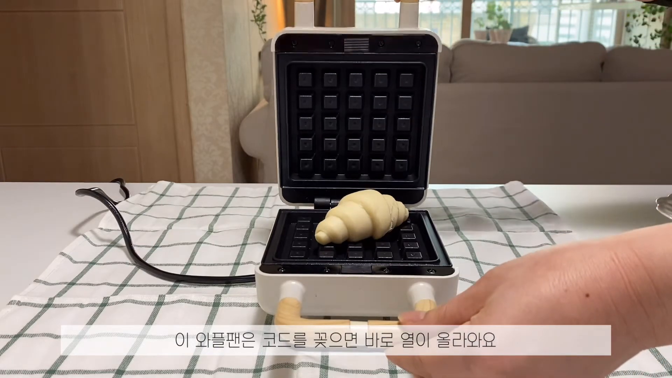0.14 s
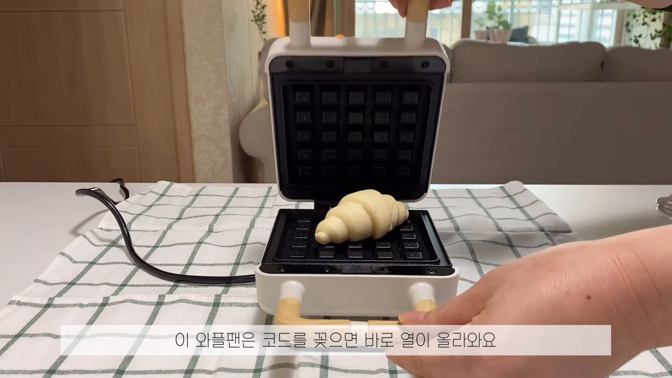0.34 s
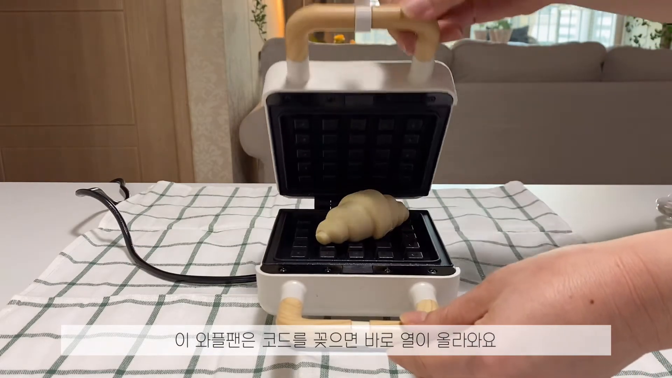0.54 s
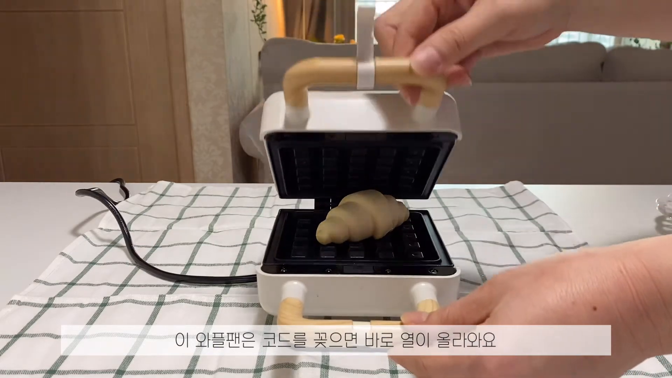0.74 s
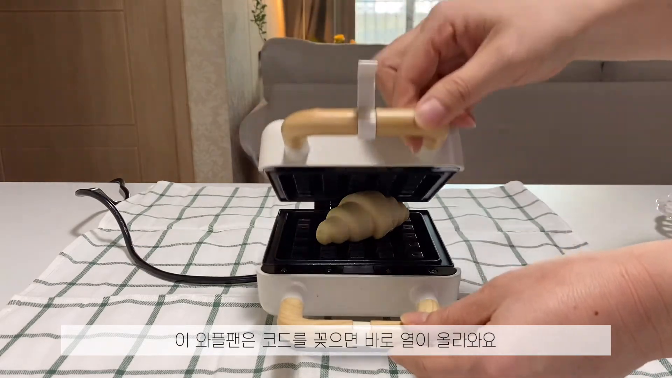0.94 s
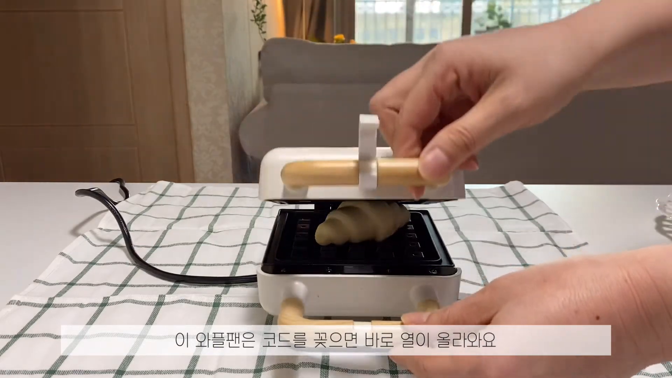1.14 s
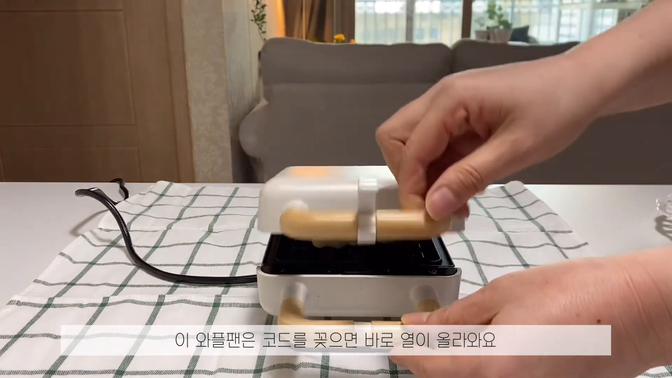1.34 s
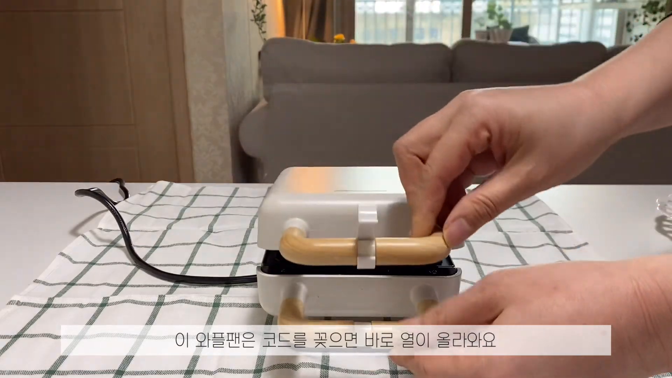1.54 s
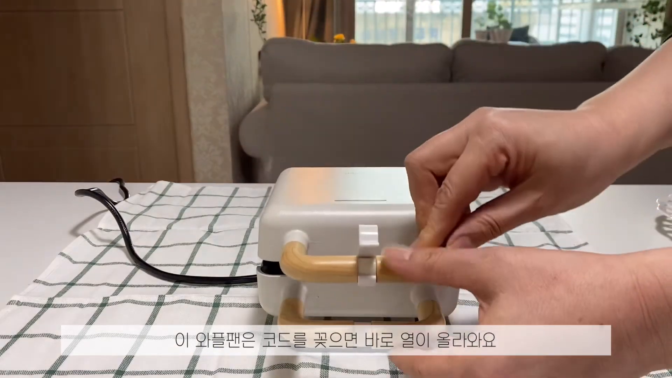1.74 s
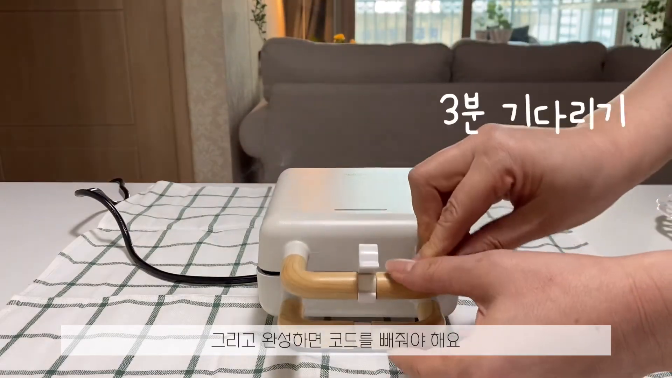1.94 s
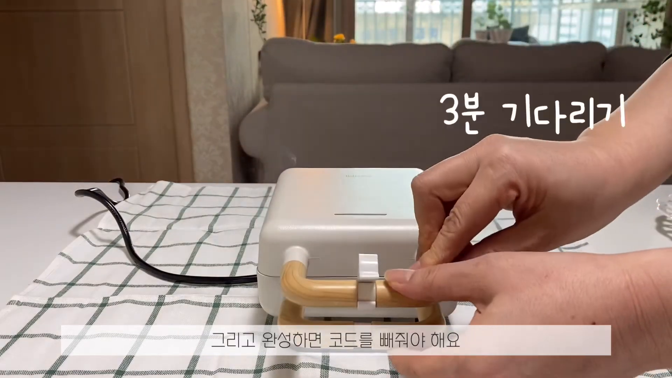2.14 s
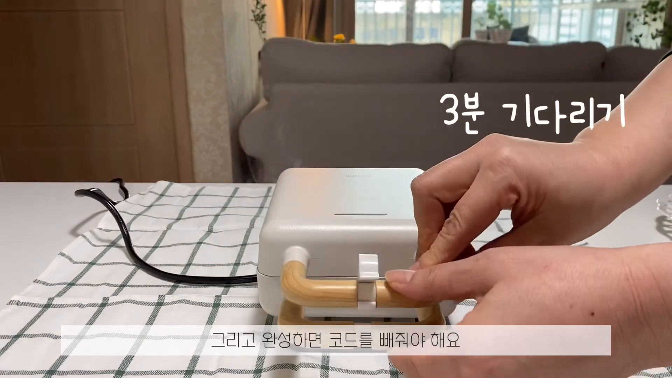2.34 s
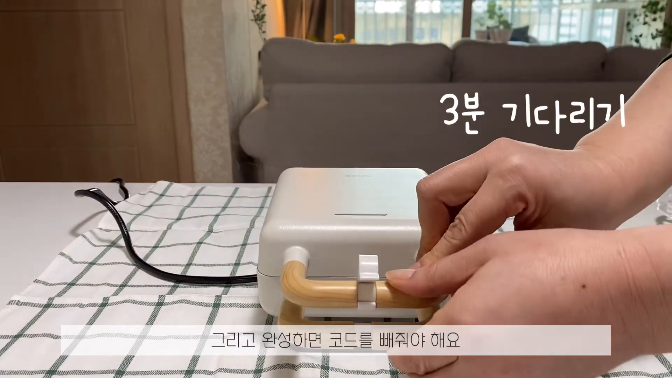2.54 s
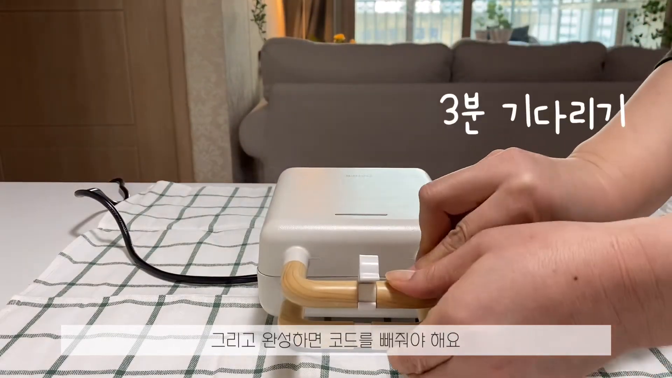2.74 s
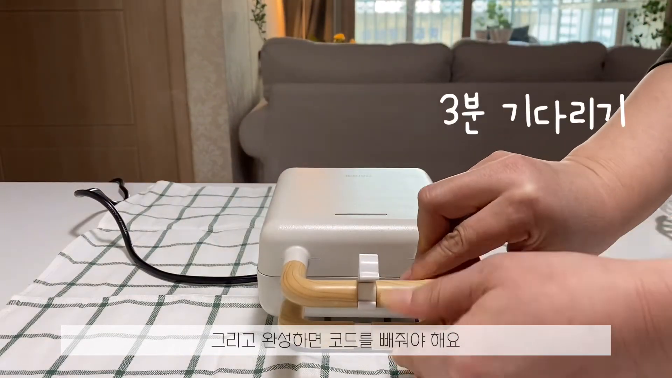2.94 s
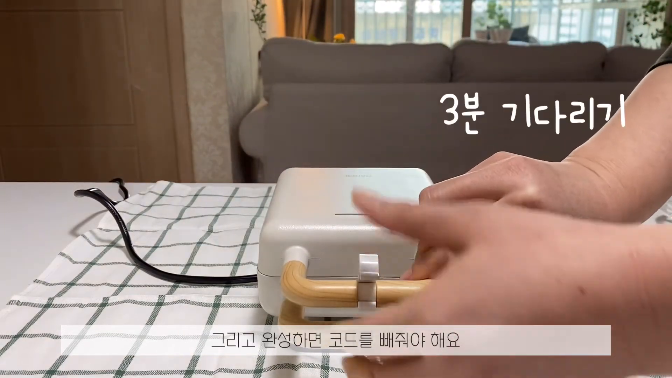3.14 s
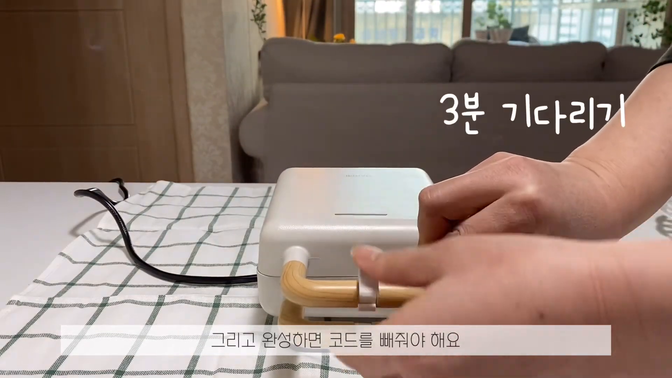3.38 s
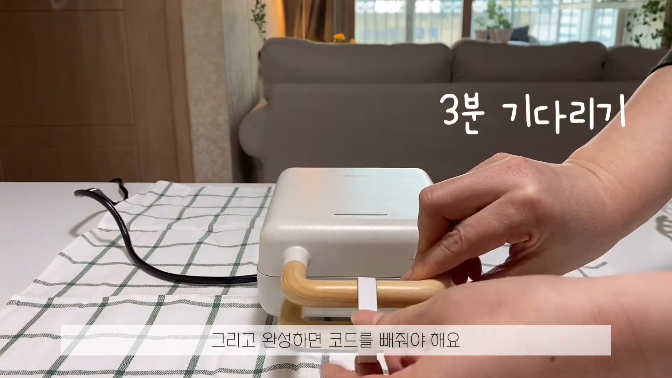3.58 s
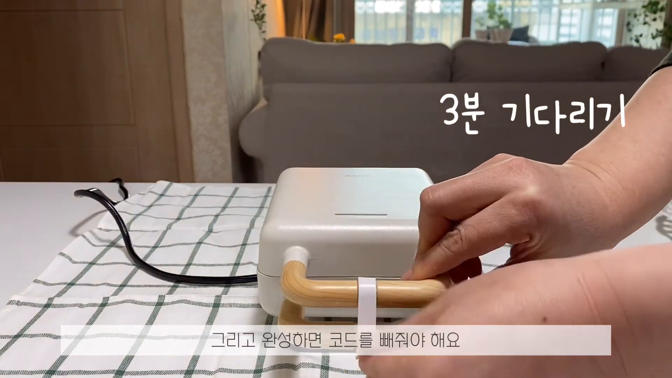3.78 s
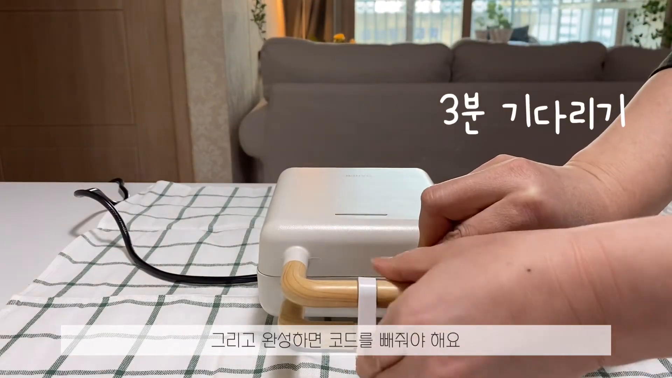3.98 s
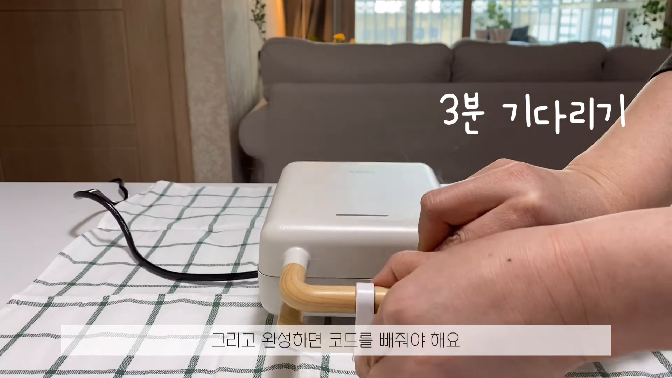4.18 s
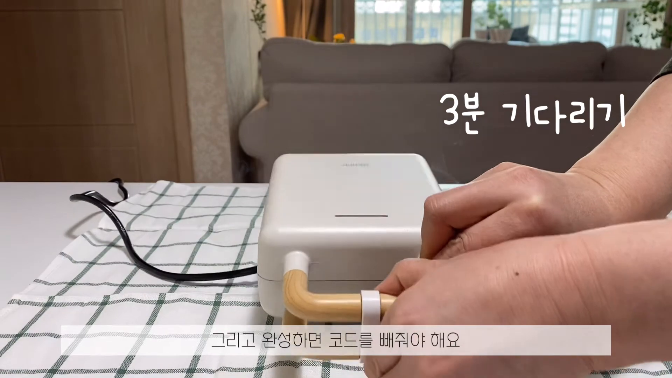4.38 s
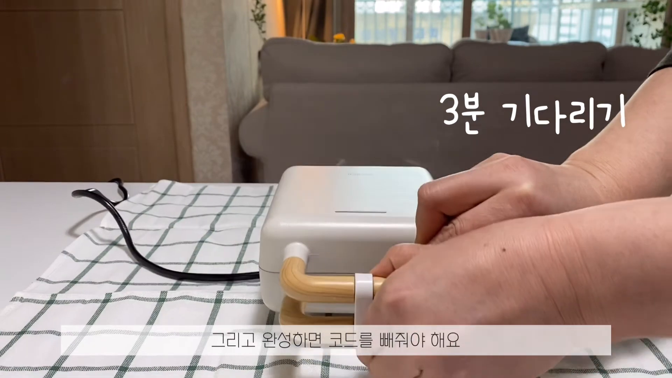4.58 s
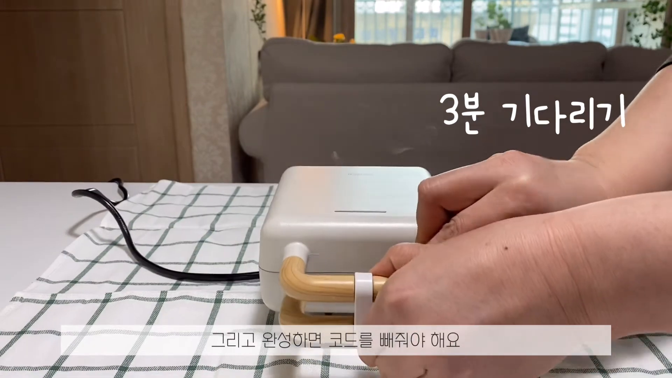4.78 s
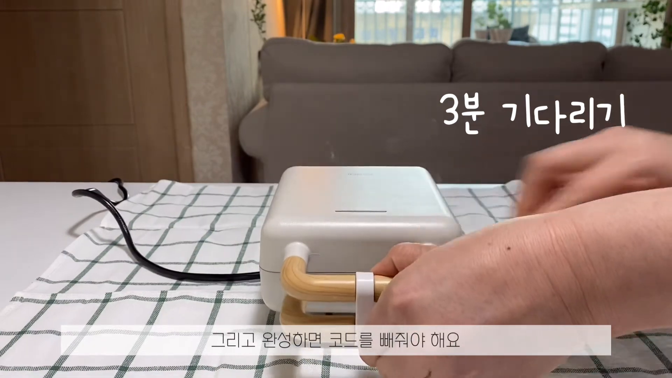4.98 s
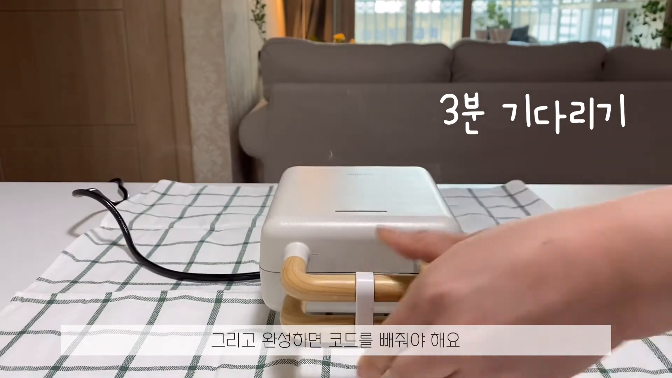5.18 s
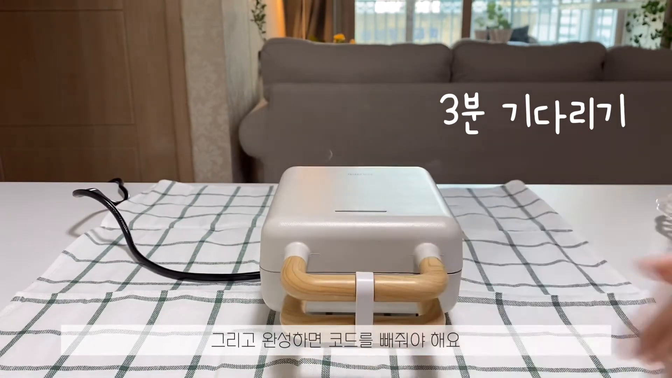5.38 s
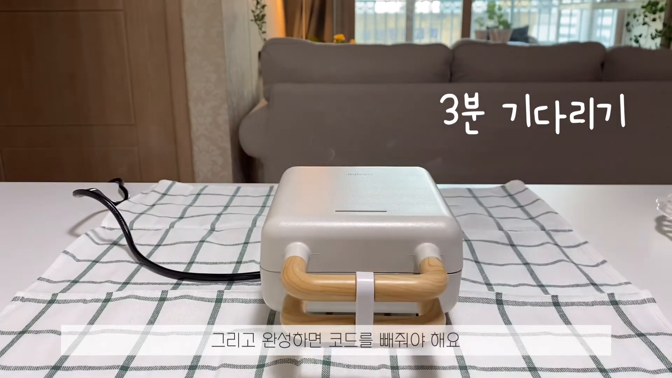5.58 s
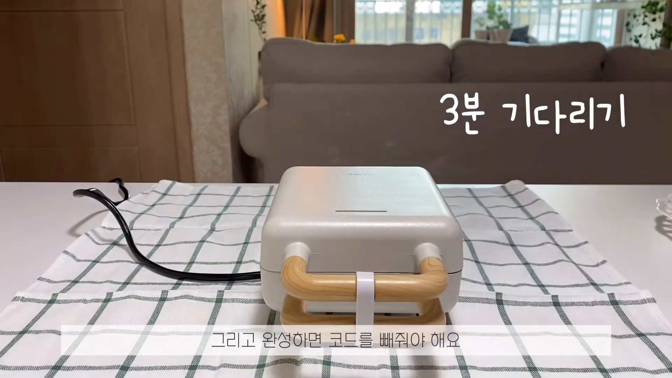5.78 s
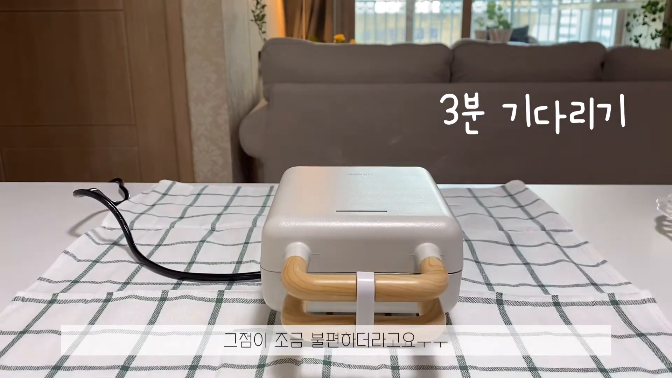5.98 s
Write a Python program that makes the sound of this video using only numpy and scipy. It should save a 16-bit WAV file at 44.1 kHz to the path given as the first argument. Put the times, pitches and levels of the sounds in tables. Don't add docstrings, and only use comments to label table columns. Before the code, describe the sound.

A quiet room with faint low hush and short echoes, heard by a close stereo phone microphone. From 0 to 0.2 s the hinge creaks in tiny ticks amid soft rubbing; small knocks come at 0.8-1.1 s. At 1.23 s the plastic lid lands with a hollow clack and immediate second touch, then a small bounce at 1.36. Dough sizzles and spits from 1.1 to 1.9 s. At 1.92 a double, duller knock presses the lid home; soft shell squeezes follow around 2.5-2.9. The clasp comes free at 3.14, clicks faintly, and catches brightly at 3.6. Two hard, dry snaps at 4.0 and 4.12 are the loudest, the second stronger, leaving a thin metallic ring. At 4.38 the iron drops with a low table thump, then rocks in muffled knocks until 4.8, with a tiny plastic chirp at 4.6. Faint touches at 5.0 and 5.37, then near silence until about 6 s.

```python
import sys
import numpy as np
from scipy import signal
from scipy.fft import rfft, irfft
from scipy.io import wavfile
from scipy.ndimage import uniform_filter1d

SR = 44100
rng = np.random.default_rng(int(sys.argv[2]) if len(sys.argv) > 2 else 0)


def transcribe(u):
    v = np.clip(np.atleast_2d(u).T, -1, 1)
    q = np.round(v * 32767).astype(np.int16)
    wavfile.write(sys.argv[1], SR, q)


def level_to_linear(level):
    exponent = np.asarray(level, float) / 20
    return 10 ** exponent


N = 265482

FIRST_S, SECOND_S = 4.0013, 4.1158
SHELL_HZ, CLACK_HZ, TICK_HZ, TOP_HZ = 240, 1200, 3100, 16300
CROWD_DB = -4.5
LEFT_LEAD_S = 3e-5
TICK_PER_HARDNESS = 2.08
CLEAR = dict(ring_s=.09, weak_db=-13)
PLATE_HZ, PLATE_T60_S = 1110, .7
AIR_DB = -68.5

# (time [s], blow level [dB], hardness [dB], table level [dB])
HINGE_KNOCKS = [
    (0.82, -51.5, 3, -62.5),
    (0.881, -47.5, 0, -61.5),
    (0.956, -48.5, -1.5, -74.5),
    (1.094, -45.5, -2.5, -74),
]
# (time [s], blow level [dB], hardness [dB], table level [dB])
HINGE_CREAKS = [(.002, -56.5, -13, -76), (.088, -59, -7, -79), (.101, -53.5, -10, -80),
                (.112, -54, -6, -78), (.125, -58, -8, -79), (.14, -55, -7, -80), (.156, -58, -8, -77),
                (.179, -57.5, -6, -80), (.724, -64, -4, -80), (.74, -64, -7, -78), (.972, -59, -6, -76),
                (1.11, -54, -7, -80)]
# (time [s], blow level [dB], hardness [dB], table level [dB])
LID_LANDING = [
    (1.2345, -17.5, -3, -46.5),
    (1.243, -21.5, 3, -55),
    (1.356, -39.5, 2.5, -54.5),
]
# (time [s], blow level [dB], hardness [dB], table level [dB])
PRESS = [
    (1.918, -30.5, -5, -56),
    (1.927, -29, -4, -42),
    (2.115, -54, -17, -53.5),
]
# (time [s], blow level [dB], hardness [dB], table level [dB])
SQUEEZE = [
    (2.475, -47.5, -7, -44.5),
    (2.761, -39, 5, -47.5),
    (2.864, -41.5, 1, -50.5),
]
# (time [s], blow level [dB], hardness [dB], table level [dB])
CLASP_CLICKS = [(1.675, -58, 1.5, -57), (1.721, -67.5, 1, -79), (1.761, -67, -1.5, -95),
                (1.857, -53.5, -22.5, -50), (3.302, -63.5, 2, -79), (3.319, -51, 4, -65),
                (3.345, -63, 2, -80), (3.439, -67, -2.5, -75), (3.464, -67.5, 3.5, -80),
                (3.478, -64, 4, -66.5), (5.002, -60, -1.5, -56)]
# (time [s], blow level [dB], hardness [dB], table level [dB])
UNHOOK = [
    (3.137, -47, 0, -82.5),
]
# (time [s], blow level [dB], hardness [dB], table level [dB])
NAILS = [
    (.798, -60.5, -1, -73),
    (1.867, -80, 1.5, -70),
    (3.522, -73.5, -1.5, -92.5),
]
# (time [s], blow level [dB], hardness [dB], table level [dB])
CATCH = [
    (3.601, -31.5, 0.0021, -44),
    (3.625, -47, -8, -71),
    (3.652, -51, -8, -70),
]
# (time [s], blow level [dB], hardness [dB], table level [dB])
FIRST_SNAP = [
    (FIRST_S, -12.5, 0, -36),
]
# (time [s], blow level [dB], hardness [dB], table level [dB])
SECOND_SNAP = [
    (SECOND_S, -8.5, 0, -32.5),
]
# (time [s], blow level [dB], hardness [dB], table level [dB])
ROCKING = [(4.381, -34.5, 1, -25), (4.392, -34, 0.5, -43), (4.491, -45.5, -16, -39.5),
           (4.55, -47, -18, -48), (4.526, -54, -14, -54), (4.586, -44.5, -16, -54), (4.685, -53, -14, -58),
           (4.835, -60, -14, -68), (4.612, -48.5, -16, -63), (4.645, -51.5, -17, -61),
           (4.665, -55, -8, -50), (4.72, -49.5, -16, -51), (4.752, -51, -16.5, -53), (4.79, -58, -14, -61),
           (4.3, -56, 0, -72), (5.369, -65.5, -3, -64), (4.436, -47, -14, -47), (4.401, -39.5, -8, -28)]
# (time [s], blow level [dB], hardness [dB], table level [dB])
EDGE_KNOCKS = [
    (4.698, -48, 0.69, -47),
    (4.666, -61, -3.1, -70),
]

# (mode [Hz], level [dB], t60 [s])
JOINT = [(500, 2.5, 0.1), (584, 0.5, 0.1), (730, -14.5, 0.04), (797, 0, 0.037), (970, -18.5, 0.015),
         (1280, 2.5, 0.04), (1734, -3, 0.0327), (2325, -8.5, 0.018), (2873, -12.5, 0.02), (4306, -2, .01),
         (5430, -3, 0.012), (7110, -3.5, 0.0088), (11110, -16.5, 0.0084)]
# (mode [Hz], level [dB], t60 [s])
LID = [(522, -4.5, 0.086), (598, -4, 0.07), (679, -0.5, 0.059), (826, -2, 0.053), (1090, -26, 0.013),
       (1290, -0.5, 0.012), (1740, -4, 0.025), (2402, -7.5, 0.04), (2873, -9, 0.071), (4500, 1.5, 0.014),
       (5560, -6.5, 0.016), (7430, -2.5, 0.014), (10800, -10, 0.02)]
# (mode [Hz], level [dB], t60 [s])
BASE = [(389, 1.5, 0.065), (583, -3, 0.05), (753, -3, 0.046), (903, -7.5, 0.034), (981, -7.5, 0.036),
        (1156, -19, 0.05), (1320, 3, 0.052), (1800, 4.5, 0.079), (2730, -13.5, 0.017), (4250, 10.5, 0.034),
        (6200, 6, 0.03), (10450, 1.5, 0.027)]
# (mode [Hz], level [dB], t60 [s])
GRIP = [(257, -3, 0.059), (381, -1.5, 0.052), (500, 0.5, 0.064), (640, -2.5, .05), (798, -4.5, 0.037),
        (998, -8.5, .04), (1325, -1, 0.045), (1760, 2.5, .04), (2680, -11, .02), (4220, 4, .02),
        (6360, 3, .015), (10400, -0.5, .01)]
# (mode [Hz], level [dB], t60 [s])
CLIP = [(469, 3, 0.027), (875, 2, 0.093), (920, 3, 0.023), (1620, 0.5, 0.011), (1868, 2, 0.024),
        (2586, -20.5, 0.021), (3280, 2, 0.0053), (4430, -2.5, 0.013), (6560, -9, 0.0099),
        (7740, 0.5, 0.0053), (10350, -9, 0.0046), (12070, -7, .006), (14800, -11, .005)]
# (mode [Hz], level [dB], t60 [s])
HOOK = [(470, -2.5, 0.05), (615, -5.5, 0.14), (846, -5.5, 0.082), (997, -8, 0.036), (1555, -2, 0.021),
        (1916, -0.5, 0.023), (2530, -11.5, 0.018), (3430, -3, 0.026), (4530, 1, 0.0131), (7220, -4.5, 0.01),
        (8404, 6.5, 0.0058), (10240, 11.5, 0.011), (12820, 12, 0.0072), (15900, 7, 0.0054)]
# (mode [Hz], level [dB], t60 [s])
SHUT = [(350, -20, 0.03), (476, -0.5, 0.052), (604, -4, 0.036), (746, 0, 0.04), (870, 0, 0.035),
        (1090, -5.5, 0.028), (1627, -2, 0.021), (1935, 2, 0.03), (2320, -11, 0.035), (3065, -8.5, 0.015),
        (4590, -4.5, 0.016), (6500, -14, 0.01), (10200, 7, 0.005), (15700, -8.5, 0.0061)]
# (mode [Hz], level [dB], t60 [s])
LOCKED = [(464, -0.15, 0.065), (619, -1, 0.04), (750.5, -1, 0.052), (911, -4.5, 0.04), (1284, -4.5, 0.026),
          (1736, 4, 0.014), (2360, -6.5, 0.03), (3380, -9.5, 0.0062), (4371, -1, 0.02), (4800, -1, 0.0095),
          (5300, -4, 0.008), (6850, 0.5, 0.0072), (8500, -8, .005), (10400, -4, 0.0045), (13480, -7, 0.006)]
# (mode [Hz], level [dB], t60 [s])
FEET = [(260, 2, 0.078), (397, 1, 0.087), (520, -1, 0.08), (760, -4.5, 0.046), (1150, -20.5, 0.038),
        (1300, -10, 0.08), (1730, -3, 0.04), (2149, -5, 0.041), (3480, -1, 0.034), (5446, -5.5, 0.019),
        (10330, -17, .01)]
# (mode [Hz], level [dB], t60 [s])
EDGE = [(367, 2.5, 0.062), (494, -1.5, 0.055), (966, -0.5, .03), (1190, -1, .04), (1460, -12, .02),
        (1680, -2, 0.028), (2320, -10, 0.013), (3050, -10.5, 0.0084), (5060, -12, 0.0095),
        (10300, -14, 0.0066)]
# (mode [Hz], level [dB], t60 [s])
LATCH = [(860, -3, .03), (1000, -7, .025), (1700, -4, 0.03), (1901, 0, 0.026), (2101, -6, .02),
         (4500, -9, .02)]
# (mode [Hz], level [dB], t60 [s])
TABLE = [(33.43, -10, 0.067), (50.6, -2, 0.24), (63.1, -12.5, 0.96), (105.7, -8, 0.27), (142, -6.5, 0.14)]
# (mode [Hz], level [dB], t60 [s])
TABLE_UNDER_WEIGHT = [(38.5, -3, 0.15), (49.3, 4.5, 0.2), (60.84, -9.5, 0.47), (103, -11.5, 0.25),
                      (153.5, -7.5, 0.064)]

# (time [s], level [dB])
PLATE_BLOWS = [
    (4.003, -59),
    (4.118, -54),
    (2.866, -83),
    (1.238, -70),
]
# (time [s], sizzle level [dB])
SIZZLE = [(1.0, -100), (1.08, -79), (1.22, -61.5), (1.37, -80.5), (1.45, -77.5), (1.59, -67), (1.7, -71),
          (1.74, -79), (1.82, -72), (1.91, -73), (1.96, -100)]
# (time [s], level [dB])
SPITS = [(1.0917, -55), (1.1144, -79), (1.1488, -69), (1.1644, -59), (1.1743, -56), (1.3079, -58),
         (1.3548, -61), (1.4171, -65), (1.4227, -63), (1.4391, -68), (1.4785, -62.5), (1.4952, -69),
         (1.5194, -63), (1.5356, -63), (1.581, -56), (1.6213, -68), (1.6379, -74), (1.6741, -55.5),
         (1.6975, -61), (1.7189, -57), (1.76, -62), (1.7898, -66), (1.8394, -73), (1.8666, -53.5),
         (1.8944, -63)]
# (frequency [Hz], level [dB per Hz])
STEAM_COLOUR = [(1200, -2.5), (1880, -11.5), (3300, -25), (5000, -0.5), (6800, -7), (9030, -20),
                (10300, -10), (13300, -19.5), (15600, -21)]
# (strongest at [s], level [dB], swell [s], fade [s])
RUBS = [(0.14, -67.5, .15, 0.17), (.42, -75.5, 0.21, 0.22), (1.14, -66.5, 0.035, 0.17),
        (0.7, -77.5, 0.15, 1.3), (1.24, -61.5, 0.098, 0.1), (1.5, -79, 0.52, 0.3), (1.99, -72, 0.59, 0.29),
        (2.53, -73.5, 0.22, 0.56), (3.75, -85, .33, .9), (4.19, -66, 0.16, 0.38), (4.7, -68, .9, 0.24),
        (5.1, -89, 1.2, 5.6)]
# (strongest at [s], scrape level [dB], skin level [dB], swell [s], fade [s])
SLIDES = [(3.15, -68.5, -84, 0.012, 0.12), (3.314, -72, -74, 0.035, 0.045), (3.478, -73, -90.5, 0.05, 0.03),
          (3.595, -65, -78, 0.03, 0.014), (3.61, -75, -77.5, 0.022, .19), (3.81, -120, -82, 0.054, 0.049),
          (4.0, -68, -100, 0.015, .008), (4.113, -56, -100, 0.014, .004), (4.389, -63, -69, 0.019, 0.08),
          (4.601, -82, -89, 0.097, .08), (4.71, -79, -72.5, 0.025, .04)]
# (frequency [Hz], level [dB per Hz])
SKIN_COLOUR = [(1470, -35), (2500, -11), (3320, -8.5), (7090, -3), (9050, -13.5), (10900, 0), (15000, -6.5),
               (16100, 5), (16500, -20.5)]
# (start [s], end [s], pitch [Hz], level [dB])
SQUEAKS = [
    (3.776, 3.826, 1665, -82),
    (3.982, 4.017, 1229, -67.5),
    (4.553, 4.592, 1800, -85),
    (4.604, 4.622, 1320, -73.5),
    (4.62, 4.635, 1206, -77),
    (4.61, 4.635, 2030, -90),
]
# (time [s], sway level [dB])
LEAN = [(0.0, -64), (0.55, -74), (1.16, -63), (1.7, -71), (1.99, -60), (2.55, -62.5), (3.1, -67.5),
        (3.28, -100), (3.64, -64.5), (3.8, -67.5), (4.02, -74), (4.08, -60), (4.4, -57), (4.72, -52),
        (4.9, -76), (6.02, -72.5)]
# (frequency [Hz], t60 [s])
ROOM_T60 = [(100, 0.42), (400, 0.25), (1000, 0.27), (3000, 0.27), (8000, 0.28), (16000, 0.18)]
# (frequency [Hz], level [dB])
ROOM_COLOUR = [(60, -20), (300, 5), (1000, 0), (3000, -2.5), (8000, -8), (16000, -9)]
# (frequency [Hz], level [dB per Hz])
AIR = [(15, -63), (25, -23), (42, -10.5), (65, 0.5), (241, -17), (261, -14), (362, -18), (716, -25.5),
       (777, -27), (7280, -43), (9050, -50), (11000, -42), (17000, -68.5)]
# (frequency [Hz], correlation [-1 to 1])
SAME = [(60, 0.56), (180, 0.81), (550, 0.2), (1650, -0.1), (4970, 0.45), (15000, 0.52)]
# (frequency [Hz], width [Hz], level [dB])
PORT_DIPS = [(8990, 560, -12.5), (13000, 450, -14)]


def contacts(rows, modes, rise_cycles, lag_s, clack_db, tick_db, pan_db,
             table=TABLE, ring_s=.05, weak_db=CROWD_DB):
    near, walls, thump = out = np.zeros((3, 2, N))
    pan = level_to_linear([[pan_db / 2], [-pan_db / 2]])
    for s, blow_db, hard_db, table_db in rows:
        tick_modes = crowd(modes, TICK_HZ, TOP_HZ, count=34)
        tick = ring(tick_modes, 7.8, apart=0.94, scatter=1)
        tick = level_to_linear(blow_db + tick_db + TICK_PER_HARDNESS * hard_db) * tick
        clack_modes = crowd(modes, CLACK_HZ, TICK_HZ, count=12)
        clack = ring(clack_modes, rise_cycles, apart=0.73, scatter=0.54)
        clack = level_to_linear(blow_db + clack_db + hard_db) * clack
        shell_modes = crowd(modes, SHELL_HZ, CLACK_HZ, count=10, weak_db=weak_db, ring_s=ring_s)
        shell = level_to_linear(blow_db) * ring(shell_modes, rise_cycles, apart=.4, scatter=0.12)
        add(near, s, pan * tick)
        add(near, s + lag_s / 2, pan * clack)
        add(near, s + lag_s, pan * shell)
        add(walls, s, all_round(tick, size=36) + all_round(clack, size=12))
        add(walls, s + lag_s, shell)
        add(thump, s, -level_to_linear(table_db) * ring(table, 0.7, apart=0.07, scatter=.12))
    return out


def crowd(modes, lo_hz, hi_hz, count, weak_db=CROWD_DB, ring_s=.06):
    hz = np.geomspace(max(lo_hz, modes[0][0]), hi_hz, count) * rng.uniform(0.95, 1.03, count)
    db = read([m[:2] for m in modes], hz) + weak_db + 2.5 * rng.standard_normal(count)
    t60 = 0.76 * read([m[::2] for m in modes], hz)
    main = [m for m in modes if lo_hz <= m[0] < hi_hz]
    every = main + list(zip(hz, db, t60))
    return [(f, level, min(t, ring_s * (500 / f) ** .75)) for f, level, t in every]


def ring(modes, rise_cycles, apart, scatter):
    hz, db, t60 = np.transpose(modes)[:, :, None]
    t = np.arange(round(min(t60.max(), .45) * SR)) / SR
    detune, phase, skew, tilt = rng.uniform(-1.1, 1, (len(modes), 4)).T[:, :, None]
    shape = level_to_linear(db - 60 * t / t60) * (1 - np.exp(-t * hz / rise_cycles)) ** 2
    turn = 2 * np.pi * hz * (1 + 0.013 * detune) * t + np.pi * scatter * phase
    lead = apart * skew + np.pi * hz * LEFT_LEAD_S
    channels = []
    for side in (1, -1):
        level = level_to_linear(side * 1.5 * apart * tilt)
        channels.append((shape * level * np.sin(turn + side * lead)).sum(0))
    sound = np.array(channels)
    return sound / abs(sound).max()


def all_round(sound, size):
    power = uniform_filter1d((abs(rfft(sound, 1024)) ** 2).mean(0), size)
    return np.fft.fftshift(irfft(np.sqrt(abs(power))))[None, 448:]


def add(mix, s, sound):
    part = mix[:, round(s * SR):][:, :sound.shape[1]]
    part += sound[:, :part.shape[1]]


def read(points, hz):
    f, value = np.transpose(points)
    return np.interp(np.log(hz + 1), np.log(f + 1), value)


def plate():
    out = np.zeros((2, N))
    for s, db in PLATE_BLOWS:
        note = ring([(PLATE_HZ, 0, PLATE_T60_S)], 18.0, apart=0.2, scatter=0.49)
        add(out, s, level_to_linear(db) * note)
    return out


def sizzle():
    unevenness = evened(uniform_filter1d(rng.standard_normal(N), size=900))
    bursts = np.cumsum(70 * level_to_linear(6.8 * unevenness)) / SR
    pops = level_to_linear(2.7 * rng.standard_normal(N)) * (np.diff(np.floor(bursts), prepend=0) > 0)
    pops = signal.lfilter([1], [1, -np.exp(-1 / (.002 * SR))], pops)
    at_s, db = np.transpose(SPITS)
    alone = np.zeros(N)
    alone[np.round(at_s * SR).astype(int)] = level_to_linear(db - 5.5)
    alone = signal.lfilter([1], [1, -np.exp(-1 / (0.0021 * SR))], alone)
    steam = noise(lambda hz: read(STEAM_COLOUR, hz) - 60 * (hz < 1200), patchy_db=1.5)
    return steam * (along(SIZZLE)[0] * (.4 + 1.3 * pops) + alone)


def rubbing():
    at_s, scrape_db, _, swell_s, fade_s = np.transpose(SLIDES)
    shell = scrape(LID[:4] + FEET[:2], per_s=600, spread_db=2.8, damping=0.45, apart=0.1)
    clasp = scrape(LATCH, per_s=900, spread_db=2.5, damping=0.7, apart=0.5)
    rubs = level_to_linear(1.0) * strokes(*np.transpose(RUBS)) * shell
    return rubs + strokes(at_s, scrape_db, swell_s, fade_s) * clasp


def brushing_skin():
    at_s, _, skin_db, swell_s, fade_s = np.transpose(SLIDES)
    skin = noise(lambda hz: read(SKIN_COLOUR, hz) - 60 * (hz < 2500), patchy_db=1.5)
    return skin * strokes(at_s, skin_db, swell_s, fade_s)


def squeaks():
    out = np.zeros(N)
    for start, end, hz, db in SQUEAKS:
        t = np.arange(start, end, 1 / SR)
        wobble = evened(uniform_filter1d(rng.standard_normal(len(t)), size=150))
        flutter = evened(uniform_filter1d(rng.standard_normal(len(t)), size=90))
        note = np.sin(2 * np.pi * np.cumsum(hz * (1 + .03 * wobble)) / SR)
        note = note * signal.windows.tukey(len(t), .4) * level_to_linear(4.0 * flutter)
        out[round(start * SR):][:len(t)] += level_to_linear(db + 5) * note
    return out


def leaning():
    sway = scrape(TABLE, per_s=240, spread_db=4.5, damping=0.35, apart=0.12)
    return level_to_linear(-1.0) * along(LEAN)[0] * sway


def scrape(modes, per_s, spread_db, damping, apart):
    size_db = spread_db * np.minimum(rng.exponential(1, (N, 2)), 4)
    slips = level_to_linear(size_db) * (rng.random((N, 2)) < per_s / SR)
    damped = [(hz, db, t60 * damping) for hz, db, t60 in modes]
    out = np.zeros((2, N))
    for k in (0, 1):
        slip = ring(damped, 0.92, apart, scatter=1.0)
        out += signal.oaconvolve(slips[None, :, k], slip, axes=1)[:, :N]
    return evened(out)


def strokes(at_s, db, swell_s, fade_s):
    t = np.arange(0, N + 32, 32) / SR
    late = t - at_s[:, None]
    away = np.maximum(late / fade_s[:, None], -late / swell_s[:, None])
    return np.interp(np.arange(N) / SR, t, level_to_linear(db[:, None] - 20 * away).sum(0))


def along(rows):
    s, *columns = np.transpose(rows)
    return [level_to_linear(np.interp(np.arange(N) / SR, s, c, -150, -150)) for c in columns]


def evened(x):
    return x / np.sqrt(np.mean(x ** 2) + 1e-30)


def noise(colour_db, patchy_db):
    frames, hz = N // 256 + 5, np.fft.rfftfreq(1024, 1 / SR)
    a, b, c, d, patches = rng.standard_normal((frames, 513, 5)).T
    patches = uniform_filter1d(patches, size=8, axis=0)
    patches = evened(uniform_filter1d(patches, size=12, axis=1))
    same = np.clip(read(SAME, hz), -1, 1)[:, None]
    left = a + 1j * b
    right = same * left + np.sqrt(1 - same ** 2) * (c + 1j * d)
    z = np.array([left, right]) * level_to_linear(colour_db(hz)[:, None] + patchy_db * patches)
    return evened(signal.istft(z, nperseg=1024, noverlap=768)[1][:, :N])


def room(x):
    taps = np.zeros((2, SR))
    at = np.arange(120, SR - 20, 20) + rng.integers(0, 20, (2, (SR - 121) // 20))
    np.put_along_axis(taps, at, rng.choice([-1., 1.], at.shape), 1)
    hz, t, z = signal.stft(taps, SR, nperseg=256)
    tail = signal.istft(z * level_to_linear(-60 * t / read(ROOM_T60, hz)[:, None]), SR, nperseg=256)[1]
    hz, t, z = signal.stft(tail / np.linalg.norm(tail[0]), SR, nperseg=1024)
    tail = signal.istft(z * level_to_linear(read(ROOM_COLOUR, hz)[:, None]), SR, nperseg=1024)[1]
    return signal.fftconvolve(x, tail, axes=1)[:, :N]


def hush():
    return level_to_linear(AIR_DB - 2.5) * noise(lambda hz: read(AIR, hz), patchy_db=1.0)


def scene():
    near, walls, thump = (
        contacts(HINGE_KNOCKS, JOINT, 1.3, lag_s=0.00086, clack_db=-12.5, tick_db=-21.5, pan_db=2.0, **CLEAR)
        + contacts(HINGE_CREAKS, JOINT, 1.3, lag_s=0.00055, clack_db=-14.5, tick_db=-30.5, pan_db=2.0)
        + contacts(LID_LANDING, LID, 0.76, lag_s=0.0008, clack_db=-14, tick_db=-18.5, pan_db=2.0, **CLEAR)
        + contacts(PRESS, BASE, 1.45, lag_s=0.00031, clack_db=-16.0, tick_db=-24.5, pan_db=2.2, **CLEAR)
        + contacts(SQUEEZE, GRIP, 0.89, lag_s=0.00037, clack_db=-13.5, tick_db=-24, pan_db=1.15)
        + contacts(CLASP_CLICKS, CLIP, 0.65, lag_s=0.0012, clack_db=2.5, tick_db=-20.5, pan_db=0.5)
        + contacts(UNHOOK, CLIP, 0.44, lag_s=0.0011, clack_db=7.5, tick_db=2.5, pan_db=1.0)
        + contacts(NAILS, CLIP, .7, lag_s=0.0015, clack_db=5.5, tick_db=14.0, pan_db=0.0)
        + contacts(CATCH, HOOK, 1.0, lag_s=.0013, clack_db=6.0, tick_db=15.0, pan_db=2.5)
        + contacts(FIRST_SNAP, SHUT, 0.93, lag_s=0.0011, clack_db=-8, tick_db=-3.0, pan_db=1.4, **CLEAR)
        + contacts(SECOND_SNAP, LOCKED, .55, lag_s=.0017, clack_db=-3.5, tick_db=0.0, pan_db=1.0, **CLEAR)
        + contacts(ROCKING, FEET, 0.54, lag_s=0.0012, clack_db=-14.5, tick_db=-21, pan_db=1.0,
                   table=TABLE_UNDER_WEIGHT)
        + contacts(EDGE_KNOCKS, EDGE, 1.0, lag_s=0.0007, clack_db=-5.0, tick_db=-4, pan_db=4.0))
    friction = sizzle() + rubbing() + brushing_skin() + squeaks()
    echoes = level_to_linear(-9.0) * room(walls + friction)
    return near + thump + plate() + friction + leaning() + echoes + hush()


def top_cut(x):
    return signal.sosfilt(signal.butter(12, 17100, fs=SR, output="sos"), x)


def record(dry):
    hz = np.fft.rfftfreq(2048, 1 / SR)
    port_db = sum(db * np.exp(-((hz - f) / width) ** 2) for f, width, db in PORT_DIPS)
    port = np.fft.fftshift(irfft(level_to_linear(port_db)))[896:1153] * np.hanning(257)
    mix = signal.oaconvolve(dry, port[None], "same", axes=1)
    return top_cut(mix)


dry = scene()
out = record(dry)
transcribe(out)
```